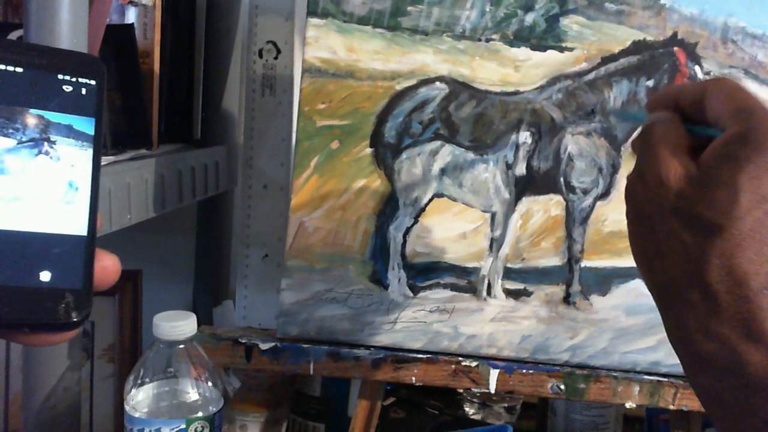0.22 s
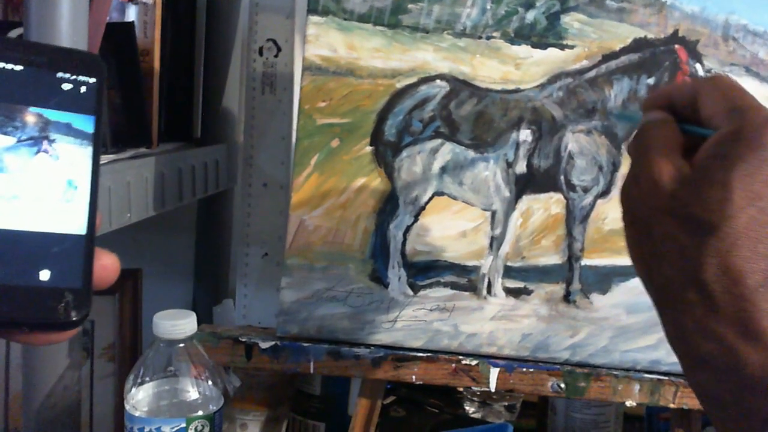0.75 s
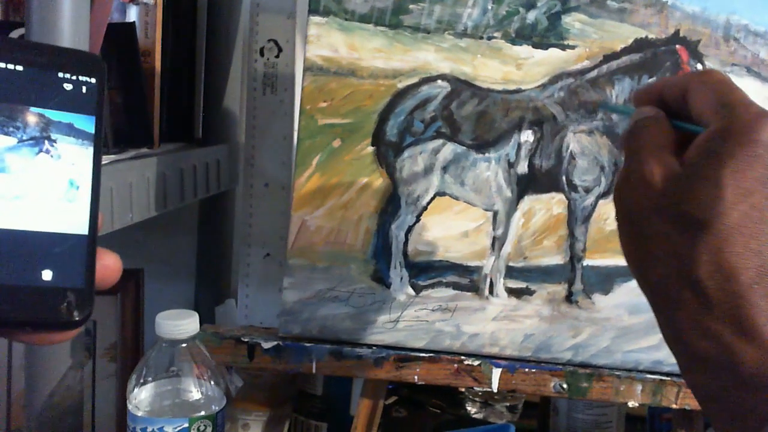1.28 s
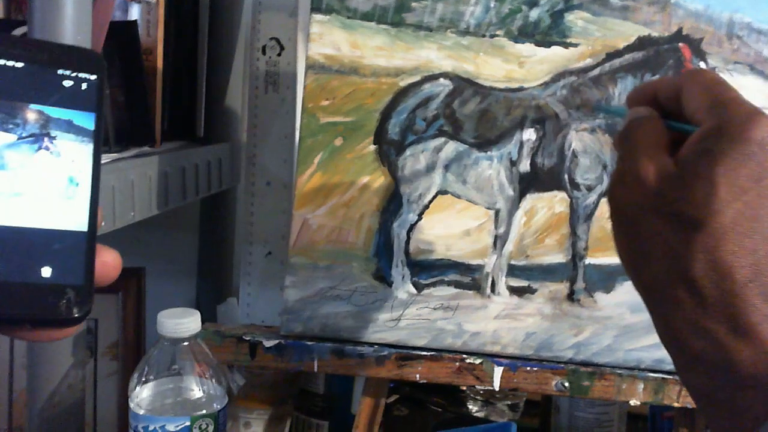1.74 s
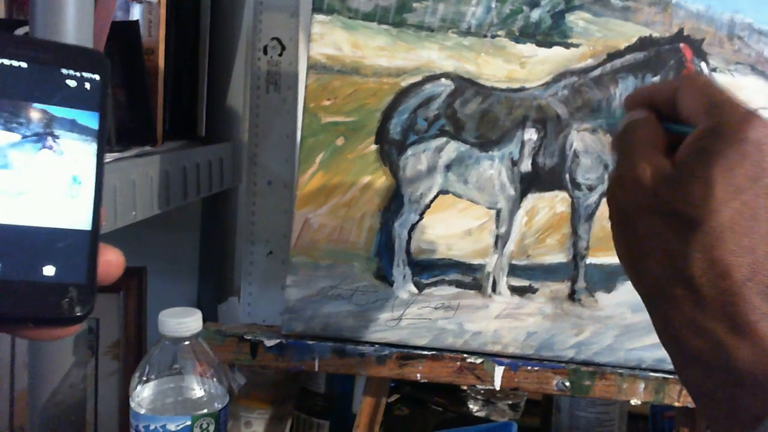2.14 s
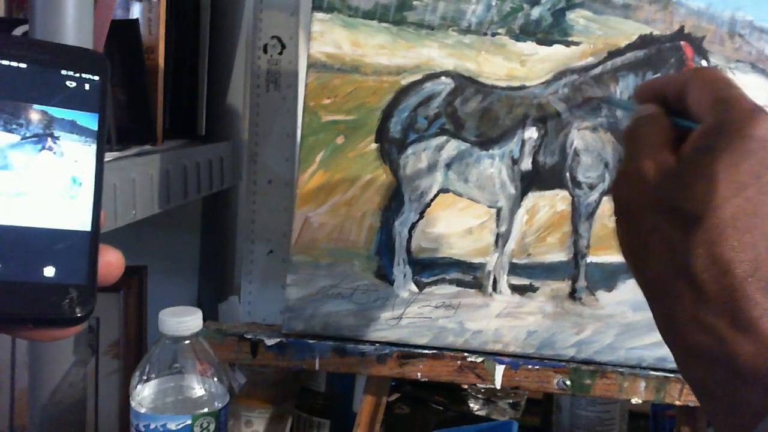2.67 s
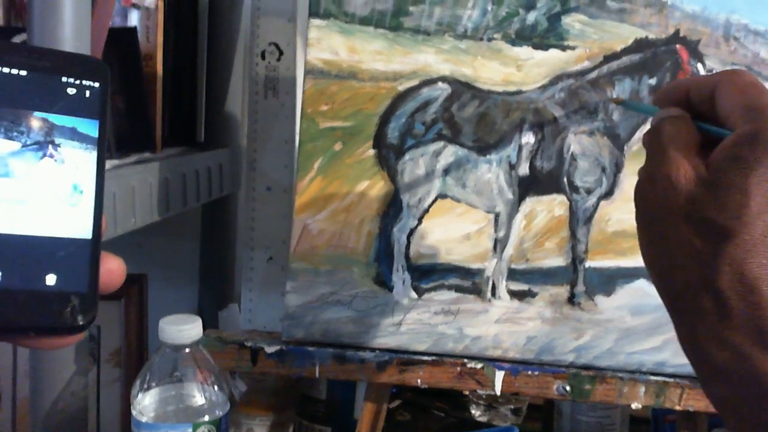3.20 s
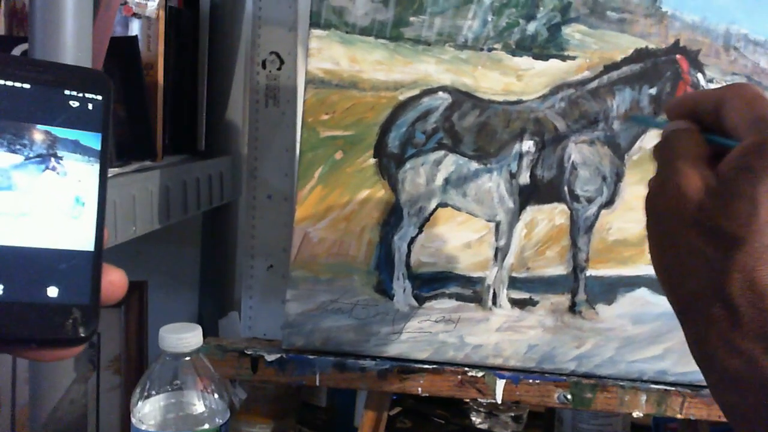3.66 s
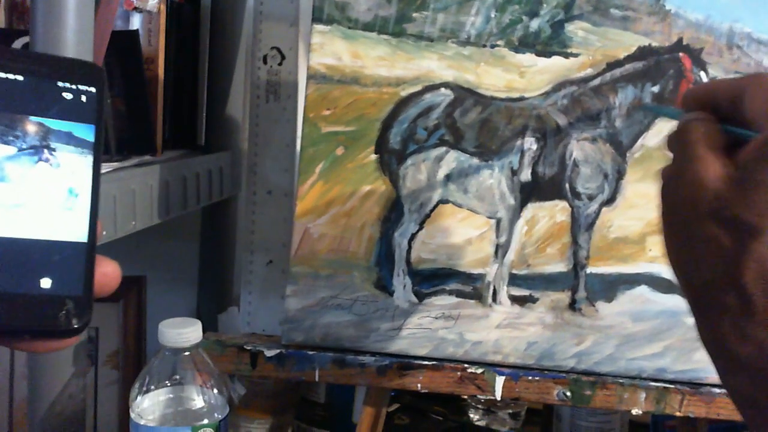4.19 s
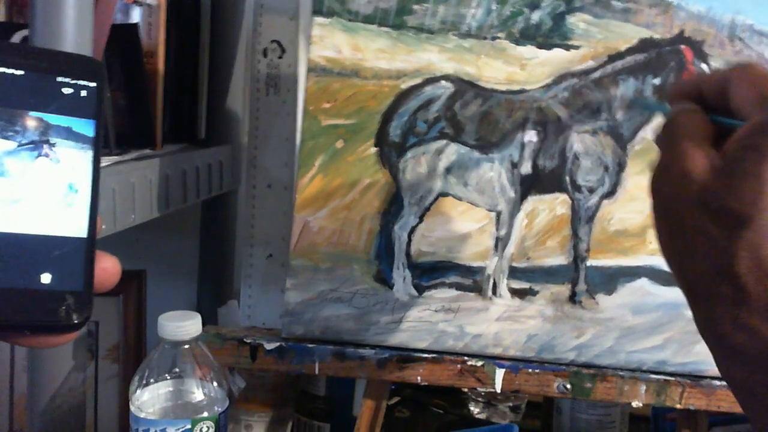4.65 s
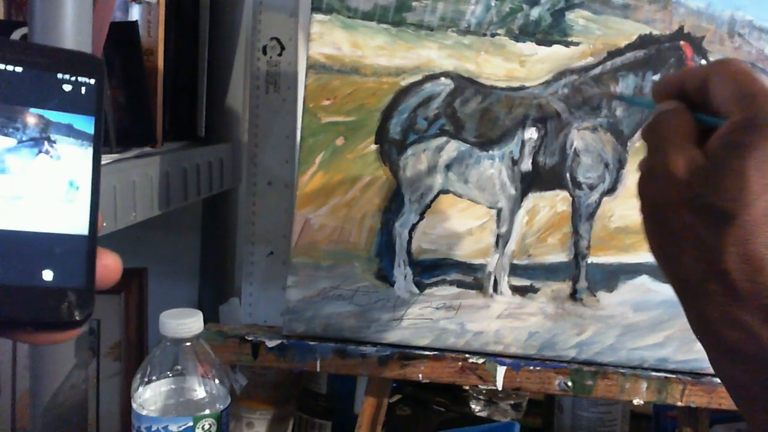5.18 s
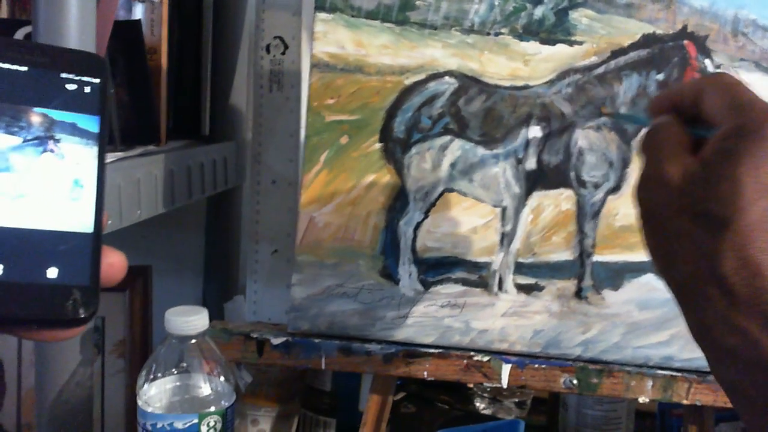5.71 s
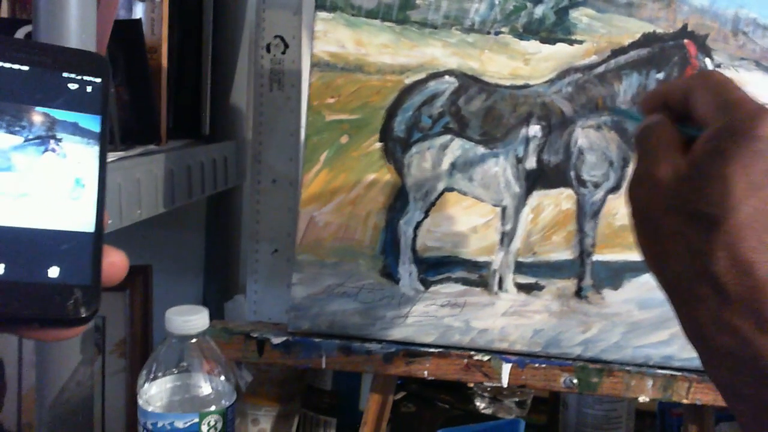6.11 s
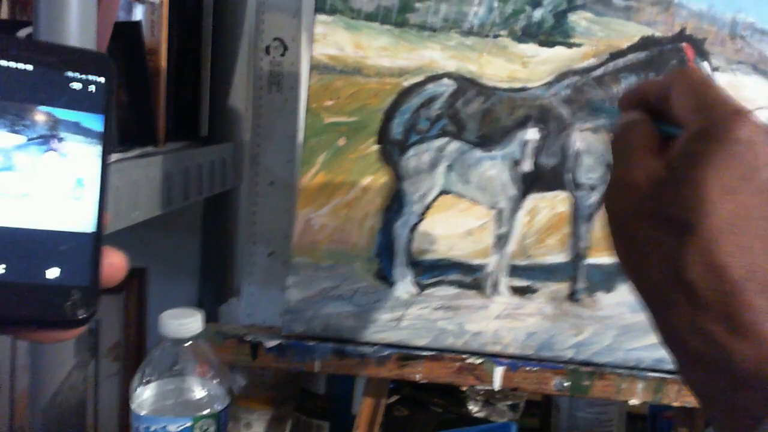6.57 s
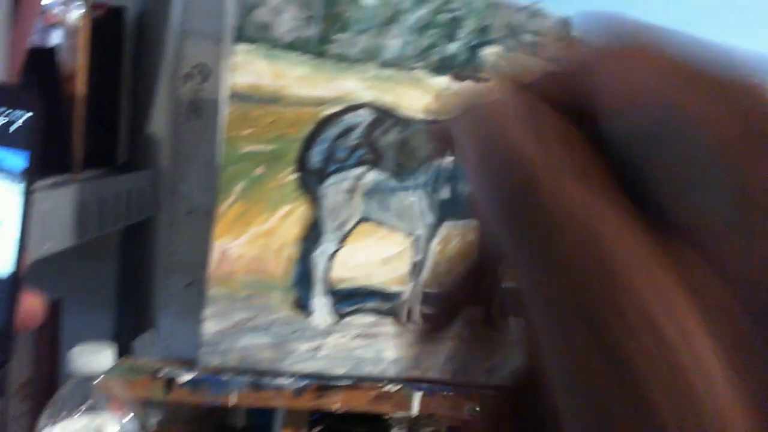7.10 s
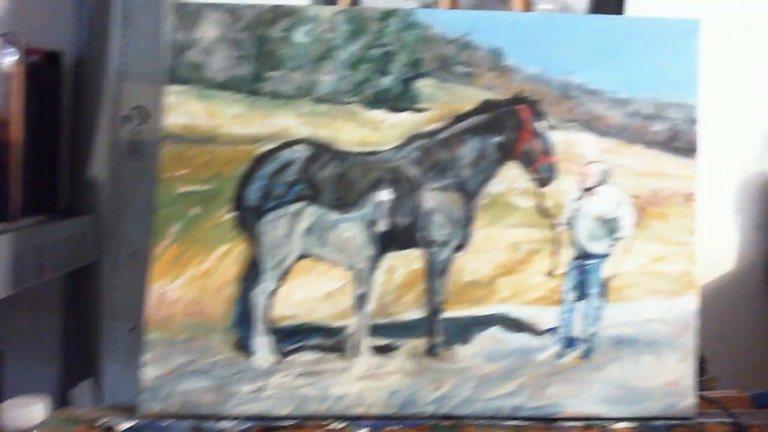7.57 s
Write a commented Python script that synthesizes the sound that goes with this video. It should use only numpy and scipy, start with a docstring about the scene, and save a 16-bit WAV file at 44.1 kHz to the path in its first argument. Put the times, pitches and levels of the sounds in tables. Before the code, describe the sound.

Over a room's constant motor hum and hiss, a paintbrush taps a canvas with soft scratches and dull little knocks.

```python
"""Brush dabbing on a canvas

A small brush dabs and scratches on a stretched canvas on an easel, close to a camera.
The bristles hiss on the weave; the canvas answers like a dull drum and springs back after each dab.
A cooling motor and the mains hum in the room over air noise and microphone hiss."""
import sys
import numpy as np
from scipy.fft import rfft, irfft, next_fast_len
from scipy.io import wavfile
from scipy.ndimage import map_coordinates

SR = 44100
rng = np.random.default_rng(int(sys.argv[2]) if len(sys.argv) > 2 else 0)


def put_to_file(sound):
    """Save the sound as 16-bit audio at rate SR, in the file named by the first command-line argument."""
    columns = np.atleast_2d(sound).T  # one column per channel
    safe = np.clip(columns, -1, 1)
    whole_steps = np.round(safe * 32767)
    wavfile.write(sys.argv[1], SR, whole_steps.astype(np.int16))


N = 346181


def amp(db):
    """Gain of a level in dB."""
    return 10 ** (np.asarray(db) / 20)


def unit(x):
    """x at rms 1."""
    return x / np.sqrt(np.mean(x ** 2) + 1e-20)


def wobble(rate):
    """A smooth random curve, rate knots a second."""
    return map_coordinates(rng.standard_normal(int(N * rate / SR) + 4), [np.arange(N) * rate / SR])


def filtered(x, response):
    """x times a complex response of frequency."""
    m = next_fast_len(N + SR // 2)
    return irfft(rfft(x, m) * response(np.fft.rfftfreq(m, 1 / SR)), m)[:N]


def coloured(points):
    """Noise of rms 1 with a (Hz, dB) spectrum."""
    f, db = np.transpose(points)
    gain = lambda hz: amp(np.interp(np.log(hz + 1), np.log(f + 1), db))
    return unit(filtered(rng.standard_normal(N), gain))


def resonant(x, modes):
    """x through a body of (Hz, width, dB) resonances, at rms 1."""
    def body(f):
        return sum((-1) ** k * amp(db) * 1j * f * width / (hz * hz - f * f + 1j * f * width)
                   for k, (hz, width, db) in enumerate(modes))
    return unit(filtered(x, body))


def add(track, s, sound):
    """Lay a sound on the track from time s on."""
    part = track[round(s * SR):][:len(sound)]
    part += sound[:len(part)]


# resonances of bristles on weave, dry scrape, canvas rasp, canvas drum: f/Hz, width/Hz, gain/dB
BRISTLE_MODES = [(4630, 110, 1), (5410, 280, -0.5), (5940, 190, 1), (6350, 280, 2), (6820, 440, 1),
                 (7300, 230, -2.5), (7740, 104, 4.5), (7780, 280, -0.5), (8080, 500, -3), (8830, 770, -5.5),
                 (10700, 970, -8.5), (14500, 1800, -48)]
SCRAPE_MODES = [(3700, 690, -3), (4240, 160, 3), (5080, 630, -3)]
RASP_MODES = [(1272, 50, 3.5), (1683, 160, -3), (2100, 100, 0.5), (2700, 540, -7.5)]
DRUM_MODES = [(261, 60, 4), (586, 95, 1), (700, 193, 3), (917, 115, -1.5)]
# strokes: t/s, length/s, hiss/dB, scrape/dB re hiss, rasp/dB re hiss
STROKES = [(0.149, 0.03, -62, -9, -4), (0.675, 0.04, -53.5, -10, -9), (0.941, 0.022, -56, -4, -9),
           (1.179, 0.019, -56.5, -5, -4), (1.444, 0.015, -55, -6, -6), (1.642, 0.024, -58, -5, -1),
           (1.672, 0.021, -60, -4, -6), (1.87, 0.017, -57, -4, -5), (1.912, 0.016, -61, -2, -2),
           (2.085, 0.027, -52, -9, -9), (2.126, 0.012, -56.4, -7, -14), (2.286, 0.018, -61, -9, -1),
           (2.304, 0.025, -59.5, 4, 6.5), (2.387, 0.026, -55, -8, -3), (2.465, 0.012, -52.5, -14, -5),
           (2.478, 0.016, -56, -9, -4), (2.497, 0.021, -60.5, 0, 7), (2.59, 0.034, -58, -3, -1),
           (2.618, 0.03, -63, 3, -2), (2.669, 0.04, -53.5, -9, -3.5), (2.758, 0.016, -57, -13, -5),
           (2.783, 0.023, -55, 0, -4), (2.808, 0.023, -54, 2, -5), (4.524, 0.064, -48, -7, -7),
           (4.767, 0.025, -52, -5, -1.5), (4.804, 0.04, -49, -9, -7.5), (5.008, 0.018, -54, -6, -6),
           (5.047, 0.033, -50.5, -12, -9), (5.236, 0.022, -51, -8, -8), (5.284, 0.015, -51.5, -12, -11),
           (5.452, 0.035, -55.5, -9, -11), (5.51, 0.012, -51, -13, -12), (5.572, 0.018, -59, -12, -10),
           (5.661, 0.012, -48.5, -11, -4), (5.675, 0.021, -55, -11, -14), (5.713, 0.013, -51, -11, -17),
           (5.77, 0.043, -57, -10, -8), (5.859, 0.026, -49, -11, -4), (5.891, 0.018, -48, -9, -11),
           (5.917, 0.014, -52.6, -10, -5), (6.063, 0.012, -50, -7, -1), (6.086, 0.011, -55, -10, -6),
           (6.121, 0.013, -51.5, -10, -8), (6.275, 0.026, -52, -5.5, -5), (6.322, 0.024, -57, -11, -13),
           (6.471, 0.011, -50.5, -7, -11), (6.521, 0.013, -55.5, -15, -5), (6.65, 0.047, -43.5, -11, -13)]

def brush():
    """Bristles snap over the threads: dense uneven grains under the pressure of each stroke."""
    grains = lambda: rng.standard_normal(N) * amp(1.2 * wobble(900) + .9 * wobble(150))
    mode_sets = (BRISTLE_MODES, SCRAPE_MODES, RASP_MODES, DRUM_MODES)
    bodies = np.array([resonant(grains(), modes) for modes in mode_sets])
    # thin tips radiate little below their lowest resonance
    bodies[0] = unit(filtered(bodies[0], lambda hz: 1 / (1 + (4700 / (hz + 1)) ** 8)))
    out = np.zeros(N)
    for start_s, length_s, hiss_db, scrape_db, rasp_db in STROKES:
        t = np.arange(round((length_s + .06) * SR)) / SR
        rise_s, tail_t60_s = .0038 + .18 * length_s, .055
        pressure = np.clip(t / rise_s, 0, 1) * amp(-60 * np.maximum(t - length_s, 0) / tail_t60_s)
        drum_db = -52.5 + .47 * (hiss_db + 56.5)
        gains = amp([hiss_db, hiss_db + scrape_db, hiss_db + rasp_db, drum_db])
        span = slice(round(start_s * SR), round(start_s * SR) + len(t))
        out[span] += pressure * (gains @ bodies[:, span])
    return out


# knocks: t/s, level/dB, f/Hz, low ring/dB re level
KNOCKS = [(2.302, -34, 737, -6), (2.314, -32, 740, -10), (2.457, -43, 910, -12), (2.473, -30.5, 666, -20),
          (2.625, -34.5, 900, -12), (2.673, -35, 676, -6), (2.768, -35, 754, -12), (4.784, -34, 710, -6),
          (4.812, -32, 600, -12), (5.512, -37, 670, -5), (5.8625, -32, 796, -15), (5.865, -22.5, 840, -7),
          (5.897, -27.5, 740, -15), (6.0652, -20.5, 664, -0.5), (6.1198, -25, 730, -2),
          (6.126, -31, 750, -3), (6.475, -39, 600, -8), (6.52, -35, 650, -11), (6.666, -33, 755, 0),
          (6.677, -34, 766, -4), (6.69, -33, 750, -10)]
# canvas overtones: ratio to f, level/dB
OVERTONES = [(1.8, -16), (2.9, -24.5)]

def knocks(rise_s=.00061, ring_t60_s=.018, low_hz=312, low_t60_s=.016):
    """The stiff base of the brush knocks the canvas, which rings briefly, high and low."""
    out, t = np.zeros(N), np.arange(SR // 10) / SR
    attack = 1 - np.exp(-t / rise_s)
    partials = [(.98, 0)] + OVERTONES
    for start_s, level_db, hz, low_db in KNOCKS:
        tone = sum(amp(db) * np.sin(2 * np.pi * ratio * hz * t) for ratio, db in partials)
        ring = amp(-60 * t / ring_t60_s) * tone
        low_ring = amp(low_db - 60 * t / low_t60_s) * np.sin(2 * np.pi * low_hz * t)
        add(out, start_s, amp(level_db) * attack * (ring + low_ring))
    return out


# ticks: t/s, level/dB, t60/s
TICKS = [(2.394, -31, .002), (2.49, -33, .002), (5.667, -29, .002), (5.898, -34, .002),
         (6.066, -23.5, 0.0022), (6.8803, -39, .0065), (7.3553, -19.5, 0.00087), (7.681, -38.5, .01)]

def ticks(hz=7000):
    """Small dry ticks: a bright ring that dies within milliseconds."""
    out, t = np.zeros(N), np.arange(SR // 10) / SR
    ring = (1 - np.exp(-t * hz)) * np.sin(2 * np.pi * hz * t)
    for start_s, db, t60_s in TICKS:
        add(out, start_s, amp(db - 60 * t / t60_s) * ring)
    return out


# canvas rebounds: t/s, peak/dB
REBOUNDS = [(0.996, -40), (1.241, -37), (1.489, -35), (1.729, -31), (1.959, -35), (2.182, -40),
            (2.583, -34), (2.87, -35), (4.616, -33), (4.866, -31), (5.107, -34), (5.338, -29), (5.564, -33),
            (5.761, -30), (5.976, -29), (6.17, -29.8), (6.382, -29.5), (6.573, -25), (6.75, -26)]
# arm movements: t/s, peak/dB, width/s
ARM_MOVES = [(6.98, -34, 0.041), (7.203, -30, 0.033), (7.296, -35, .057), (7.596, -21.5, 0.023)]

def air_pushes(rebound_width_s=.039):
    """The canvas springs back, the arm draws away: each a slow pressure dip between two bumps."""
    out, t = np.zeros(N), np.arange(-SR // 5, SR // 5) / SR
    rebounds = [(centre_s, db, rebound_width_s) for centre_s, db in REBOUNDS]
    for centre_s, db, width_s in rebounds + ARM_MOVES:
        spread = 2 * (t / width_s) ** 2
        add(out, centre_s + t[0], -amp(db) * (1 - 2 * spread) * np.exp(-spread))
    return out


# thuds: t/s, peak/dB, f/Hz
THUDS = [(5.494, -30, 40), (5.693, -32.5, 26), (5.902, -31.5, 29), (6.103, -24.5, 24), (6.297, -33, 19),
         (6.495, -42.2, 40.0), (6.679, -45, 34), (7.189, -28.5, 52), (7.575, -25, 11)]

def thuds():
    """Easel and hand thud dully, about one low cycle each."""
    out, t = np.zeros(N), np.arange(-SR // 5, SR // 5) / SR
    for centre_s, db, hz in THUDS:
        envelope = amp(db) * np.exp(-(2 * t * hz) ** 2)
        add(out, centre_s + t[0], envelope * np.cos(2 * np.pi * hz * t))
    return out


def squeak(centre_s=4.15, width_s=.07, hz=2040, band_hz=92, db=-59.5):
    """A faint thin squeak: narrow-band noise swells and fades once."""
    t = np.arange(N) / SR
    mode = [(hz, band_hz, 0)]
    band_noise = resonant(resonant(rng.standard_normal(N), mode), mode)
    return amp(db) * np.exp(-((t - centre_s) / width_s) ** 2) * band_noise


# motor and mains harmonics: order, rms/dB
SHAFT_ORDERS = [(3, -73), (5, -54), (6, -76), (7, -67.5), (8, -67), (9, -56.5)]
MAINS_ORDERS = [(1, -48.5), (2, -55.5), (4, -70.5)]
# drones: f/Hz, waver/Hz, rms/dB
DRONES = [(406, 2.09, -61), (378, 1.04, -67.5), (299, 1.03, -70), (921, 12, -68), (746, 15, -68)]

def hum(shaft_hz=58.94, mains_hz=60.0):
    """Cooling motor and mains hum at steady pitch, beside drones that waver."""
    t = np.arange(N) / SR
    motor = [(order * shaft_hz, 0, db) for order, db in SHAFT_ORDERS]
    mains = [(order * mains_hz, 0, db) for order, db in MAINS_ORDERS]
    out = np.zeros(N)
    for hz, waver_hz, db in motor + mains + DRONES:
        turns = hz * t + np.cumsum(waver_hz * wobble(4)) / SR + rng.random()
        out += np.sqrt(2) * amp(db + .31 * wobble(3.13)) * np.sin(2 * np.pi * turns)
    return out


# drone curve: t/s, f/Hz, rms/dB
LOW_DRONE = [(0, 90.8, -52), (.8, 90.2, -49.5), (1.2, 90.4, -68), (1.6, 89.7, -52), (2.4, 89.5, -52.5),
             (2.95, 89, -61), (3.3, 89.8, -52), (4, 89.2, -57), (5.4, 88.6, -64), (7.85, 90, -56.5)]

def low_drone():
    """One low tone slowly swells and fades, drifting slightly in pitch."""
    knots_s, hz, db = np.transpose(LOW_DRONE)
    t = np.arange(N) / SR
    turns = np.cumsum(np.interp(t, knots_s, hz)) / SR
    return np.sqrt(2) * amp(np.interp(t, knots_s, db)) * np.sin(2 * np.pi * turns)


# flutter harmonics: order, depth/dB re tone
FLUTTER = [(1, -9), (2, -9), (3, -12), (4, -15)]

def whine(hz=13171, db=-65.5, flutter_hz=15.0):
    """The electronics give a thin high tone that dips at a regular rate."""
    t = np.arange(N) / SR
    dips = sum(amp(depth_db) * np.cos(2 * np.pi * k * flutter_hz * t) for k, depth_db in FLUTTER)
    return np.sqrt(2) * amp(db) * (1 - dips) * np.sin(2 * np.pi * hz * t)


# noise spectra: f/Hz, relative density/dB
AIR_SPECTRUM = [(3, -2.5), (12, 1), (25, -12.5), (40, -15), (70, -21.5), (145, -21.5), (175, -27),
                (280, -23.5), (520, -27.5), (760, -29.5), (960, -29.5), (1020, -32.5), (1500, -38),
                (2400, -43), (16000, -66.5)]
HISS_SPECTRUM = [(500, -7.5), (2500, -0.5), (5000, -1), (6500, 0), (9000, -1), (12500, -0.5), (14000, 2),
                 (15700, 1.5)]

def noise_floor(air_db=-41, hiss_db=-52.5):
    """Room air noise swells a little over the even hiss of the microphone."""
    swell = amp(.35 * wobble(3))
    return amp(air_db) * swell * coloured(AIR_SPECTRUM) + amp(hiss_db) * coloured(HISS_SPECTRUM)


def scene():
    """All sources at one microphone."""
    painting = brush() + knocks() + ticks() + air_pushes() + thuds()
    background = hum() + low_drone() + whine() + noise_floor() + squeak()
    return (painting + background)[None]


def record(dry, top_hz=15730, dc_offset=-.0428):
    """The camera keeps nothing above its band limit and its converter sits off zero."""
    return (filtered(dry[0], lambda hz: hz < top_hz) + dc_offset)[None]


dry = scene()
out = record(dry)
put_to_file(out)
```